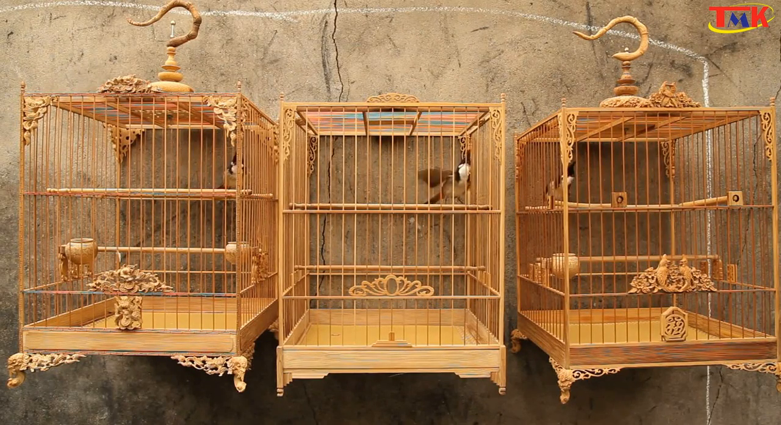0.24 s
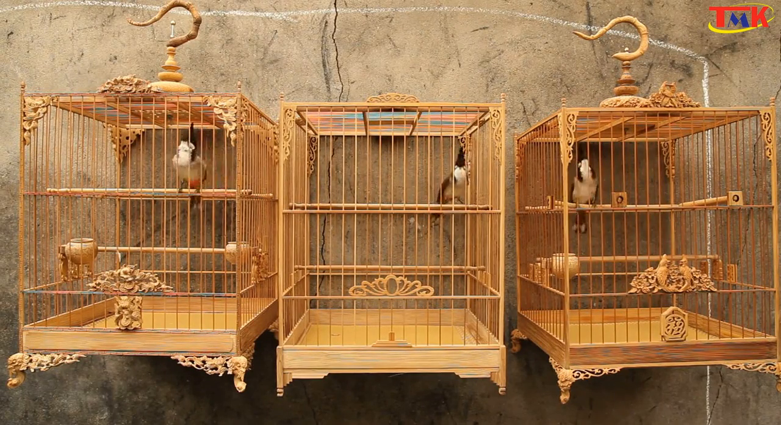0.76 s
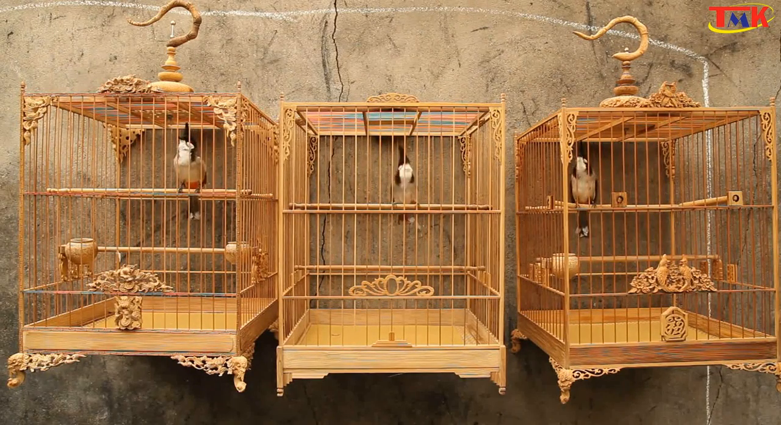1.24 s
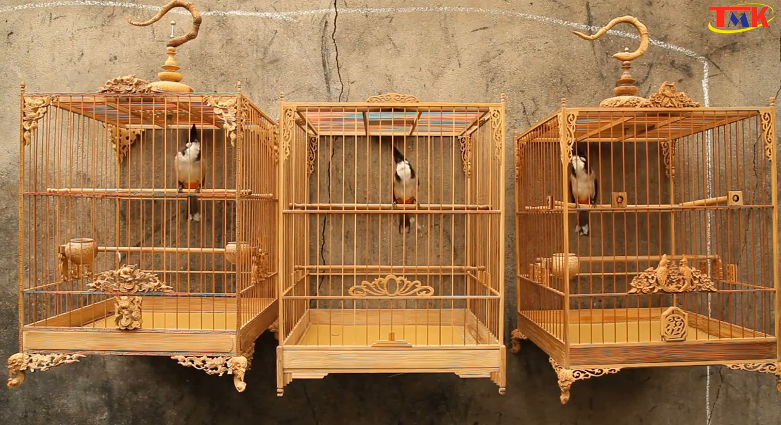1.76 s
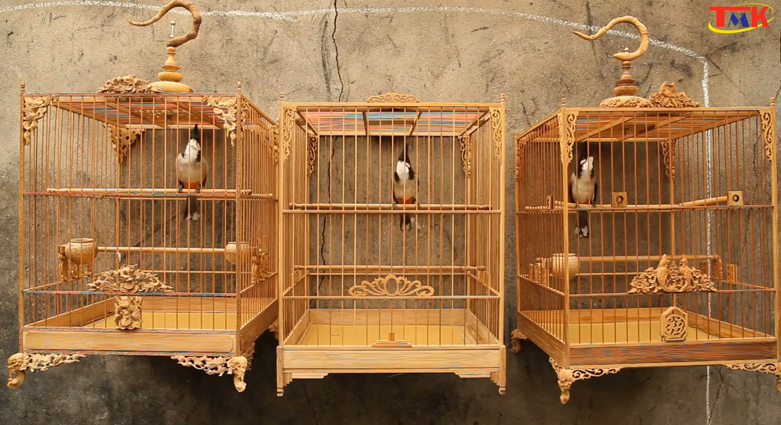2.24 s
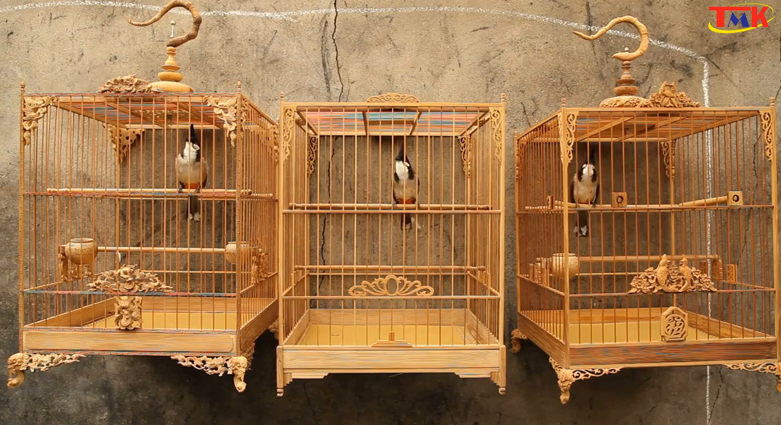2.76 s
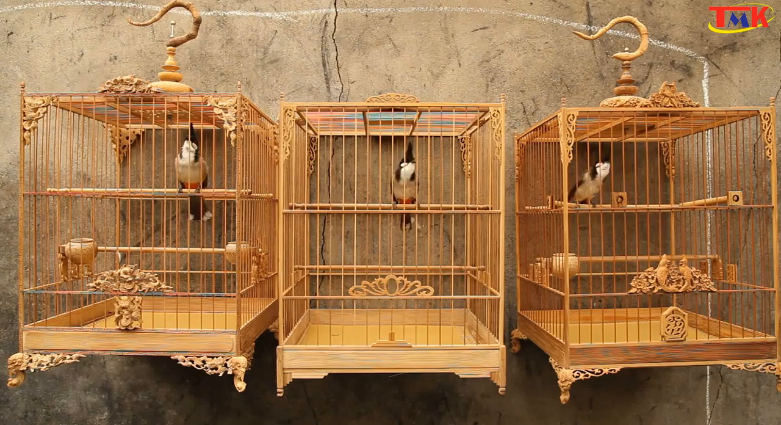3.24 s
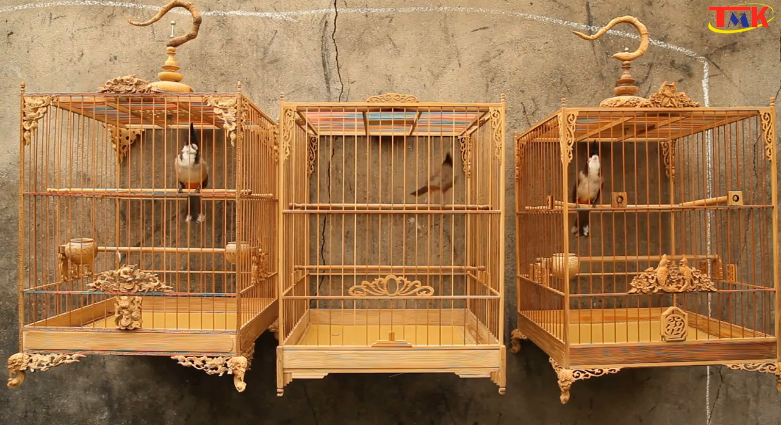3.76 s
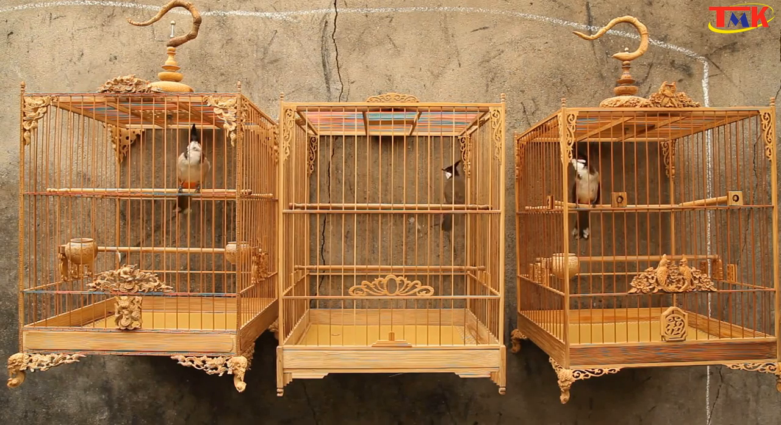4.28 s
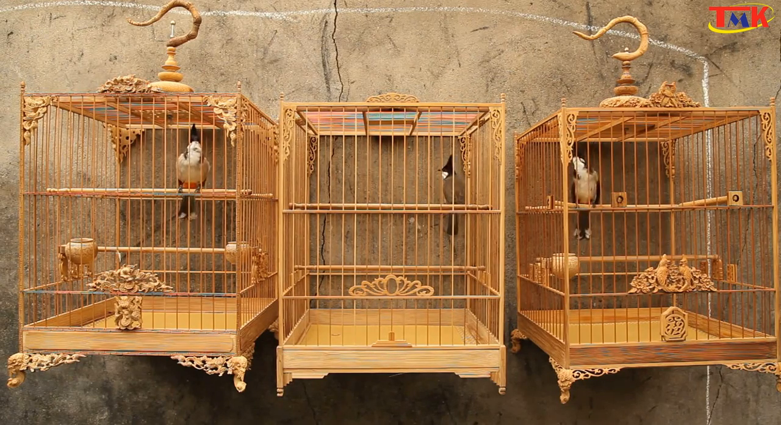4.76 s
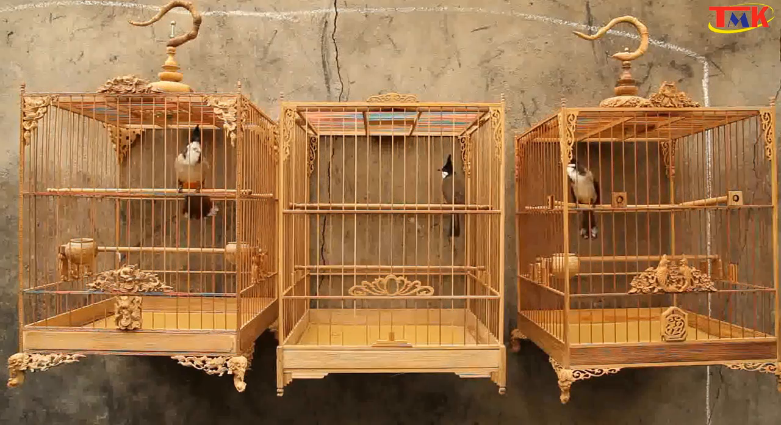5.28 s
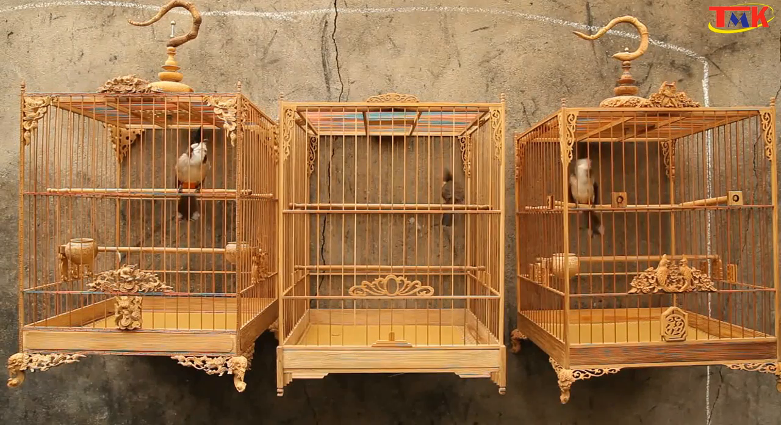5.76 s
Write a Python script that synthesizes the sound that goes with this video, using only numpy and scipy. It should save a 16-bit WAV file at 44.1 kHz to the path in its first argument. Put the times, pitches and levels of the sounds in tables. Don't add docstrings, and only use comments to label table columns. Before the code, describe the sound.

Bright gliding birdsong in short bursts, one loud whistler and a nearer reedy singer, ringing in a walled yard over quiet hum.

```python
import sys
import numpy as np
from scipy import signal
from scipy.fft import rfft, irfft, next_fast_len
from scipy.io import wavfile
from scipy.ndimage import uniform_filter1d, minimum_filter1d, map_coordinates

SR = 44100
rng = np.random.default_rng(int(sys.argv[2]) if len(sys.argv) > 2 else 0)


def invert_db(level):
    return 10 ** (np.asarray(level, dtype=float) / 20)


def unload_wav(signal):
    wavfile.write(
        sys.argv[1],
        SR,
        np.round(np.clip(np.atleast_2d(signal).T, -1, 1) * 32767).astype(np.int16),
    )


N = 265041

# f/Hz, density/dB
TOWN_SPECTRUM = [(7.1, -53), (12, -10), (59, -14.5), (128, -5), (344, -13), (438, -10.5), (509, -16),
                 (1370, -18), (1640, -23), (1960, -18), (2980, -24), (7330, -27.5), (10800, -45),
                 (15500, -46)]
# t/s, level/dB
HUM_LEVEL = [(0, -1), (1, 0), (2.2, 2), (3, 0.5), (3.8, 0), (4.4, -4.5), (5, 0), (6.01, -3.5)]
# middle t/s, half length/s, level/dB
TRAFFIC_SWELLS = [(0, 0.082, -42), (0.427, 0.091, -40.5), (1.3, 0.1, -57), (2.783, 0.13, -44.5),
                  (4.555, 0.21, -47.5), (5.2, 0.37, -48.5)]
# t/s, length/s, level/dB
FLUTTERS = [
    (0.132, 0.066, -38.5),
    (0.249, 0.081, -21),
    (4.813, 0.055, -32.5),
    (5.886, 0.099, -35.5),
]
# f/Hz, density/dB
CAGE_SPECTRUM = [(900, -120), (1500, -12), (3000, 3.5), (5000, -14), (9000, -31), (15000, -40.5)]
# f/Hz, t60/s
YARD_T60 = [(1000, 0.63), (3000, 0.67), (6000, 0.62), (12000, 0.44)]
# f/Hz, level/dB
WALL_COLOUR = [(1000, -0.5), (4000, -2.5), (7000, -3.5), (12000, -6)]
# f/Hz, level/dB
THROAT_RESPONSE = [(1000, -7.5), (1600, -6.5), (2200, -2.5), (3500, 1), (4600, -5.5), (7000, -7),
                   (9300, -15), (11000, -6), (12500, -13.5), (14000, -13.5), (15500, -30)]
# f/Hz, side minus mid/dB
STEREO_WIDTH = [(30, -20), (125, -20), (400, -16), (1000, -19), (2400, -39), (4400, -23), (7000, -16),
                (15000, -14)]
# f/Hz, level/dB
MASK_FLOOR = [(300, -60), (600, -47), (1400, -43), (2500, -60), (7000, -56), (9000, -51), (11000, -54),
              (12300, -49), (15500, -50)]

# t/s, length/s, entry f/Hz, goal f/Hz, level/dB
FAR_NOTES = [(0, 0.038, 1584, 1595, -28), (.148, 0.049, 1392, 1872, -23.5), (.19, 0.051, 1860, 1722, -25.5),
             (.225, 0.036, 1263, 1334, -23.5), (.265, 0.0583, 1357, 1580, -25),
             (2.712, .05, 1970, 3530, -34.5), (2.76, 0.19, 3483, 3360, -36.5),
             (5.33, 0.024, 1563, 1310, -28.5), (5.73, 0.027, 1453, 1600, -23.5),
             (5.77, 0.023, 1510, 1650, -35), (5.895, 0.012, 1373, 1485, -18),
             (5.925, 0.031, 1494, 1570, -42)]
CLIMBS = [(.76, 0.026, 2420, 2820, 1), (.88, 0.028, 2133, 2684, -4), (1.365, 0.025, 2476, 2608, 4.5),
          (3.006, .1, 1798, 3704, 5), (5.537, .063, 2798, 3950, 0)]
SCOOPS = [(.252, .06, 3088, 3205, -19.5), (.68, 0.094, 2968, 3940, 2), (1.388, 0.091, 3336, 3333, 2),
          (3.752, .105, 3060, 3930, 4), (4.027, 0.11, 2991, 3965, 2.5)]
HOOKS = [(.474, 0.063, 1877, 3188, -2), (1.003, 0.054, 2557, 3213, -5), (1.708, 0.0367, 2706, 3057, -7.5),
         (1.735, .07, 2342, 2840, -5), (3.436, .064, 2900, 3300, 4.5), (5.467, 0.071, 1793, 3258, -5)]
DROPS = [
    (0, 0.019, 3410, 2500, -27),
    (1.52, 0.036, 3216, 2634, 3.5),
    (3.498, 0.0588, 3452, 3145, 5),
]
REED_GLIDES = [(.64, 0.028, 1424, 2040, -11.5), (.662, 0.039, 2143, 2517, 2.5),
               (.74, 0.045, 1650, 1940, -18), (.80, 0.031, 3230, 3125, 2.5), (.9, 0.22, 4390, 6580, -24.5),
               (1.69, 0.042, 1357, 1924, -8), (3.17, 0.0456, 1652, 2024, -8), (3.275, .045, 2043, 1842, -2),
               (3.425, 0.027, 1975, 2038, -3), (1.805, 0.046, 2173, 1562, -10),
               (1.138, 0.029, 2187, 1584, -7), (3.55, .05, 2925, 2323, -0.5), (3.6, .11, 2395, 1614, -5.5)]
REED_SCOOPS = [(.945, 0.084, 2432, 2480, -3), (1.076, 0.076, 2243, 2235, -4.5),
               (1.238, 0.066, 2290, 2620, -2), (1.582, 0.0767, 2426, 2267, -2.5),
               (3.298, .087, 2680, 2529, 1.5)]
REED_HOOKS = [(3.1, 0.075, 1355, 2203, -7)]
# t after phrase start/s, f/Hz, level/dB
PHRASE = [
    [(0, 1338, -19.5), (.02, 1504, -6)],
    [(.003, 2725, -27), (.022, 2930, -17)],
    [(.021, 1624, 3), (.042, 1741, -8.5), (.05, 2141, -0.5), (.064, 2240, 0), (.082, 1843, 2),
     (.115, 1608, -10)],
    [(.1, 3320, -24), (.118, 3277, -21), (.125, 2864, -8.5), (.136, 1967, -4), (.15, 1200, -11.5)],
]
# t/s, level/dB
PHRASE_STARTS = [
    (1.887, -0.5),
    (4.584, -4),
    (4.947, -3),
]

FACING_S = 3.75


def unit(x):
    return x / np.sqrt(np.mean(x ** 2) + 1e-20)


def along(points, hz):
    f, v = np.transpose(points)
    return np.interp(np.log(hz + 1), np.log(f + 1), v)


def wobble(rate_hz, count=N):
    knots = rng.standard_normal(int(N * rate_hz / SR) + 4)
    return map_coordinates(knots, [np.arange(count) * rate_hz / SR])


def filtered(x, response):
    m = next_fast_len(N + 8192)
    return irfft(rfft(x, m) * response(np.fft.rfftfreq(m, 1 / SR)), m)[..., :N]


def widened(pair):
    side = filtered(pair[1], lambda hz: invert_db(along(STEREO_WIDTH, hz)))
    return np.array([pair[0] + side, pair[0] - side])


def town():
    t = np.arange(N) / SR
    hum = unit(filtered(widened(rng.standard_normal((2, N))), lambda hz: invert_db(along(TOWN_SPECTRUM, hz))))
    hum_db = -42.5 + 2.8 * wobble(7) + np.interp(t, *np.transpose(HUM_LEVEL))
    drone = unit(filtered(rng.standard_normal(N), lambda hz: 1 / (1 + ((hz - 148) / 14) ** 2)))
    idle_db = -52.5
    swells = sum(invert_db(db) * np.exp(-((t - s) / half_s) ** 2) for s, half_s, db in TRAFFIC_SWELLS)
    whine = np.sin(2 * np.pi * 15661 * t + .4 * wobble(30))
    return invert_db(hum_db) * hum + (invert_db(idle_db) + swells) * drone + invert_db(-60.5) * whine


def shaped(rows, bend, swell, entry_db, exit_db, top=1, sag=1, scoop=0, scoop_s=.01):
    u = np.linspace(0, 1, 17)
    top, swell = np.clip(top, .1, 1), np.clip(swell, .05, .6)
    run = np.minimum(u / top, 1) ** bend
    after = np.maximum(u - top, 0) / max(1 - top, .01)
    breath_db = entry_db * np.clip(1 - u / swell, 0, 1) + exit_db * u ** 3
    notes = []
    for start_s, length_s, entry_hz, goal_hz, db in rows:
        t = length_s * u
        flick = 1 - scoop * np.exp(-(t / scoop_s) ** 2)
        pitch_hz = (entry_hz + (goal_hz - entry_hz) * run) * sag ** after * flick
        notes.append(np.transpose([start_s + t, pitch_hz, db + breath_db]))
    return notes


def sing(notes, overtones_db, quaver, burr_db, breath_db):
    out, air = np.zeros(N + SR), rng.standard_normal(N + SR)
    shake, burr = wobble(380), wobble(420)
    for note in notes:
        s, hz, db = np.transpose(note)
        start = max(round(s[0] * SR), 0)
        t = np.arange(start, max(round(s[-1] * SR), start + 64)) / SR
        span = len(t)
        pitch_hz = uniform_filter1d(np.interp(t, s, hz), size=180, mode="nearest")
        shaken_hz = pitch_hz * (1 + quaver * shake[start:][:span])
        phase = 2 * np.pi * np.cumsum(shaken_hz) / SR
        tone = np.sqrt(2) * sum(invert_db(g) * np.sin((k + 1) * phase) for k, g in enumerate(overtones_db))
        edge = np.clip(np.minimum((t - t[0]) / .005, (t[-1] - t) / .005), 0, 1)
        size = invert_db(np.interp(t, s, db) + burr_db * burr[start:][:span]) * edge ** 2
        out[start:][:span] += size * (tone + invert_db(breath_db) * air[start:][:span])
    return filtered(out[:N], lambda hz: invert_db(along(THROAT_RESPONSE, hz)) / (1 + (900 / (hz + 1)) ** 4))


def yard(x, direct_db, early_db, early_t60, late_db):
    hz, t, z = signal.stft(rng.standard_normal((2, SR)), SR, nperseg=128)
    early = invert_db(early_db - 60 * t / early_t60) / np.sqrt(early_t60)
    late = invert_db(late_db - 60 * t / along(YARD_T60, hz)[:, None])
    colour = invert_db(along(WALL_COLOUR, hz))[:, None]
    tail = signal.istft(z * (early + late) * colour, SR, nperseg=128)[1] / np.sqrt(0.051 * SR)
    wet = signal.fftconvolve(np.pad(x, (130, 0))[None], tail, axes=1)[:, :N]
    return invert_db(direct_db) * x + widened(wet)


def far_birds():
    t = np.arange(N) / SR
    flaps = sum(invert_db(db) * np.clip(4 * (t - s) * (s + d - t) / d ** 2, 0, 1) for s, d, db in FLUTTERS)
    beating = rng.standard_normal(N) * invert_db(0.79 * wobble(98))
    rustle = unit(filtered(beating, lambda hz: invert_db(along(CAGE_SPECTRUM, hz))))
    notes = shaped(FAR_NOTES, bend=0.86, swell=0.21, entry_db=6, exit_db=-4.5)
    voice = sing(notes, overtones_db=[0, -22], quaver=0.03, burr_db=6.5, breath_db=-23.5)
    return yard(voice + flaps * rustle, direct_db=-8, early_db=-6, early_t60=.2, late_db=-2)


def whistlers():
    notes = (shaped(CLIMBS, bend=.7, swell=0.35, entry_db=-16.5, exit_db=0.5)
             + shaped(SCOOPS, bend=1.1, swell=0.33, entry_db=-6, exit_db=-6.5, scoop=.27, scoop_s=.011)
             + shaped(HOOKS, bend=.9, swell=0.26, entry_db=-4, exit_db=4.5, top=.32, sag=.84)
             + shaped(DROPS, bend=1.1, swell=0.19, entry_db=-18, exit_db=-15))
    away_notes = [n for n in notes if n[0][0] < FACING_S]
    facing_notes = [n for n in notes if n[0][0] >= FACING_S]
    away = sing(away_notes, overtones_db=[-0.5, -27.5, -28, -48.0],
                quaver=.055, burr_db=5.5, breath_db=-20.0)
    facing = sing(facing_notes, overtones_db=[1.0, -20.5, -17.5, -55],
                  quaver=.044, burr_db=6.0, breath_db=-19.5)
    return yard(away + facing, direct_db=-8, early_db=-7.5, early_t60=0.2, late_db=-5.0)


def reedy_singer():
    notes = (shaped(REED_GLIDES, bend=.75, swell=0.71, entry_db=-1.5, exit_db=-5)
             + shaped(REED_SCOOPS, bend=1.106, swell=0.26, entry_db=-12, exit_db=-3.5, scoop=.36, scoop_s=.021)
             + shaped(REED_HOOKS, bend=0.97, swell=0.15, entry_db=-5, exit_db=-2, top=0.53, sag=.76))
    phrases = [[(start_s + s, hz, db + start_db) for s, hz, db in note]
               for start_s, start_db in PHRASE_STARTS for note in PHRASE]
    husky = sing(notes, overtones_db=[1.0, -31, -25.5, -23.5, -27.5, -23.5],
                 quaver=.014, burr_db=3, breath_db=-20.5)
    clear = sing(phrases, overtones_db=[-2, -31, -25.5, -24.5, -21.5, -24],
                 quaver=.005, burr_db=3.5, breath_db=-22)
    return yard(husky + clear, direct_db=-4.5, early_db=-7.0, early_t60=0.25, late_db=-3)


def scene():
    return town() + far_birds() + whistlers() + reedy_singer()


def ducked(x):
    open_db, duck_from_db, duck_share = -2.5, -24, 0.59
    react_s, forget_db_per_s = 0.061, 15.5
    span = round(react_s * SR)
    creep_db = forget_db_per_s * np.arange(N) / SR
    power = np.abs(uniform_filter1d(x.mean(axis=0) ** 2, size=span, origin=(span - 1) // 2))
    memory_db = np.maximum.accumulate(10 * np.log10(power + 1e-12) + creep_db) - creep_db
    return x * invert_db(open_db - duck_share * np.maximum(memory_db - duck_from_db, 0))


def limited(x, top, hold_s):
    span = round(hold_s * SR)
    need = np.minimum(1, top / (np.abs(x).max(axis=0) + 1e-9))
    return x * uniform_filter1d(minimum_filter1d(need, size=span), size=span // 2)


def thinned(x):
    hz, t, z = signal.stft(x, SR, nperseg=1536)
    power = np.abs(z.mean(axis=0)) ** 2
    band_power = np.add.reduceat(power, np.arange(0, len(hz), 8))
    bands = np.repeat(band_power, 8, axis=0)[:len(hz)]
    kept = bands > bands.max(axis=0) * invert_db(2 * along(MASK_FLOOR, hz))[:, None]
    return signal.istft(z * kept, SR, nperseg=1536)[1][:, :N]


def top_cut(x):
    return signal.sosfilt(signal.butter(12, 16240, fs=SR, output="sos"), x)


def record(dry):
    x = limited(ducked(dry), top=.76, hold_s=.0012)
    x = x / (1 + np.abs(x / 0.77) ** 4.8) ** (1 / 6.9)
    thump = filtered(x ** 2, lambda hz: hz / (hz + 500) / (1 + (hz / 1500) ** 4))
    x = x + invert_db(-21) * thump
    x = filtered(thinned(x), lambda hz: hz < 15800)
    return top_cut(x)


dry = scene()
out = record(dry)
unload_wav(out)
```